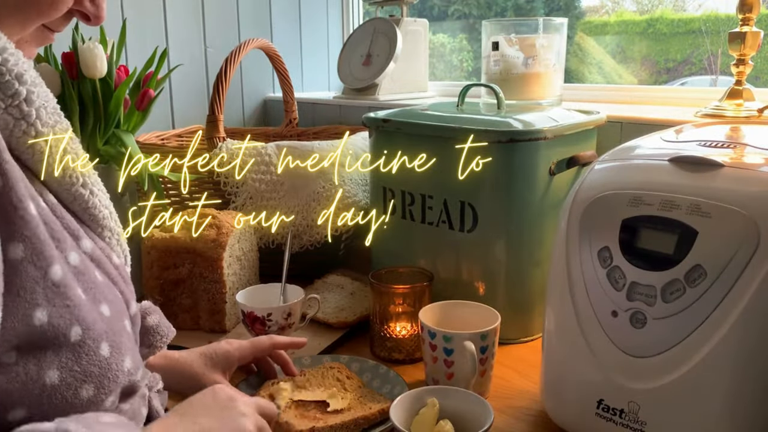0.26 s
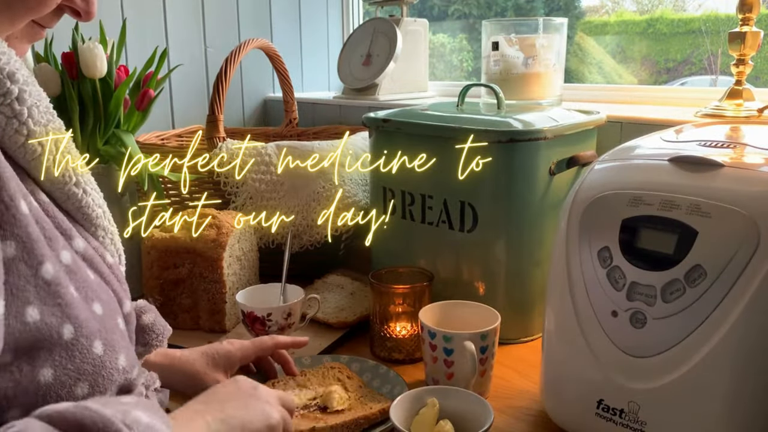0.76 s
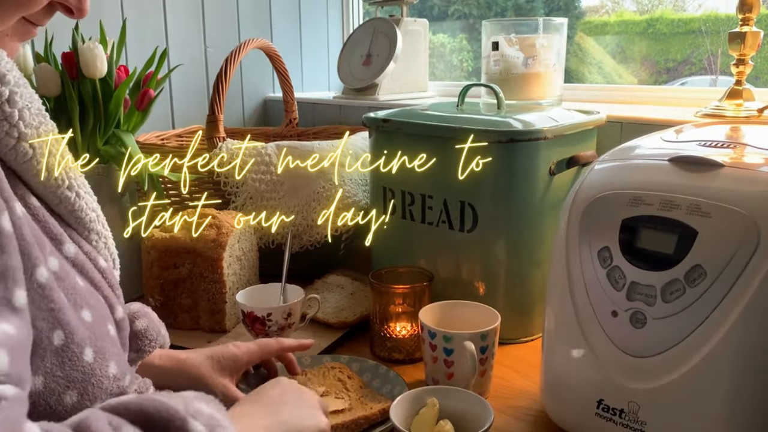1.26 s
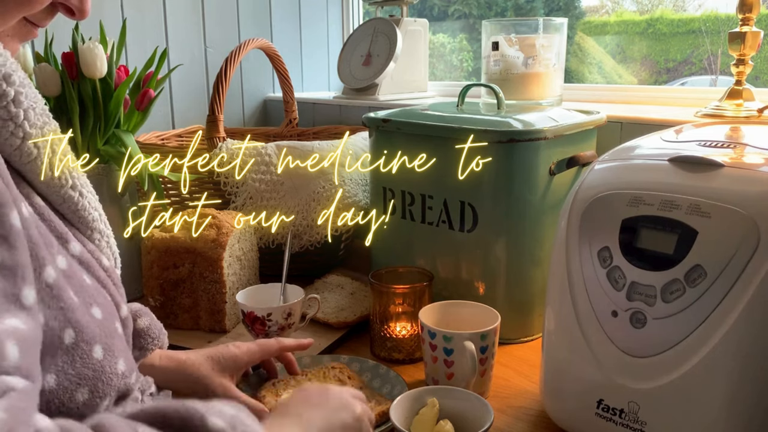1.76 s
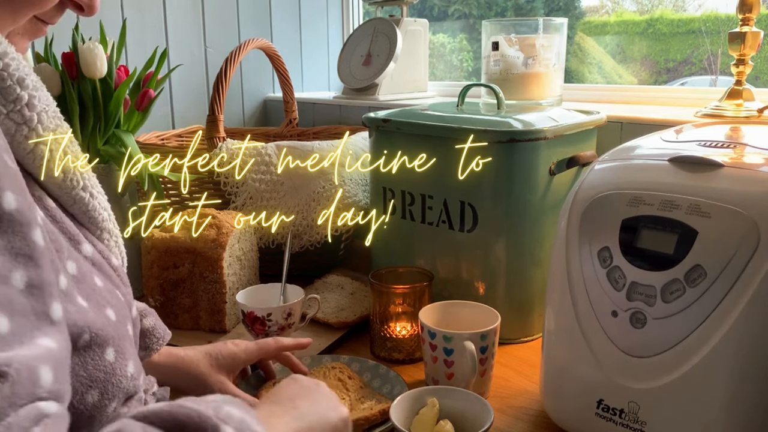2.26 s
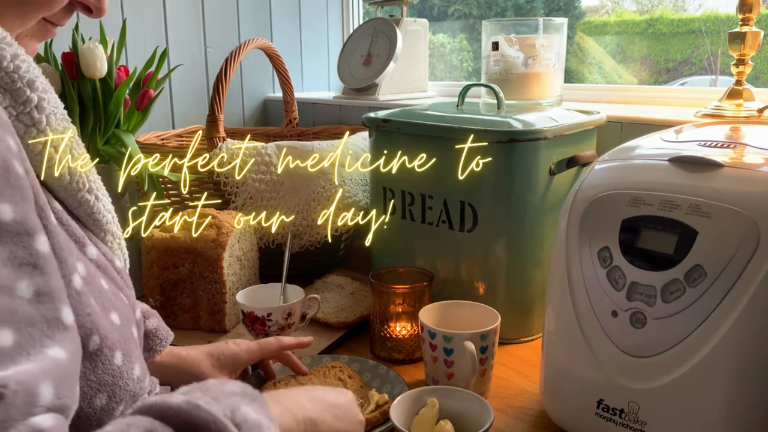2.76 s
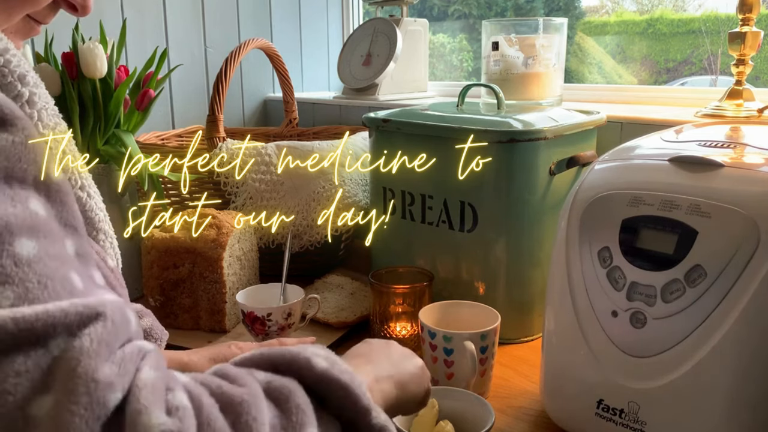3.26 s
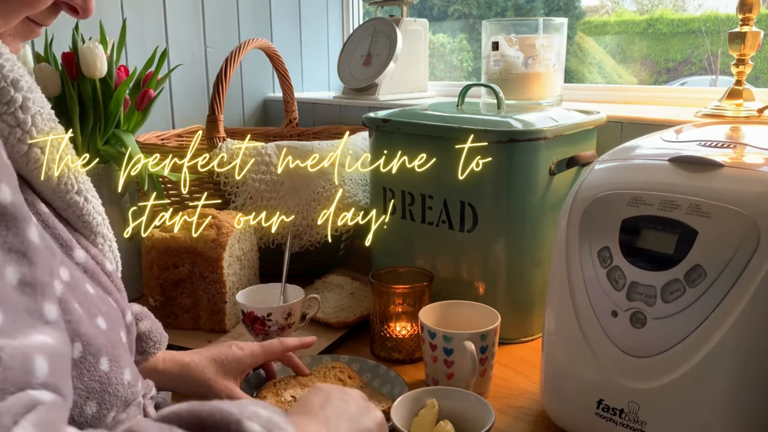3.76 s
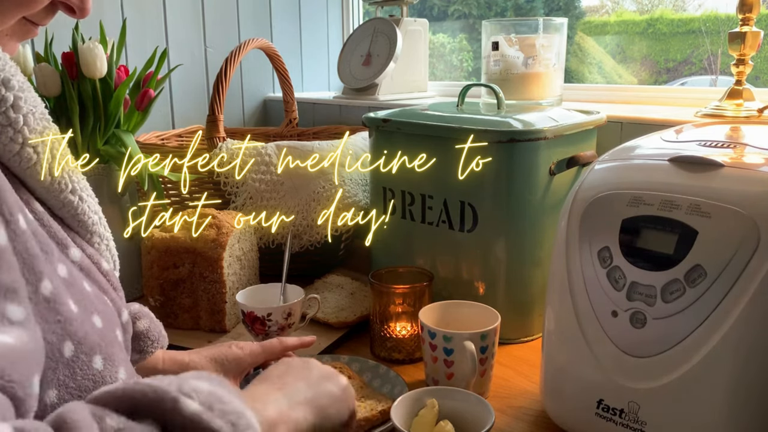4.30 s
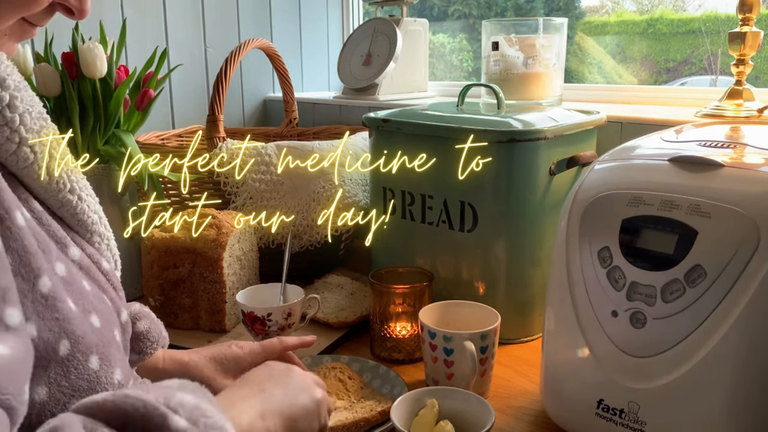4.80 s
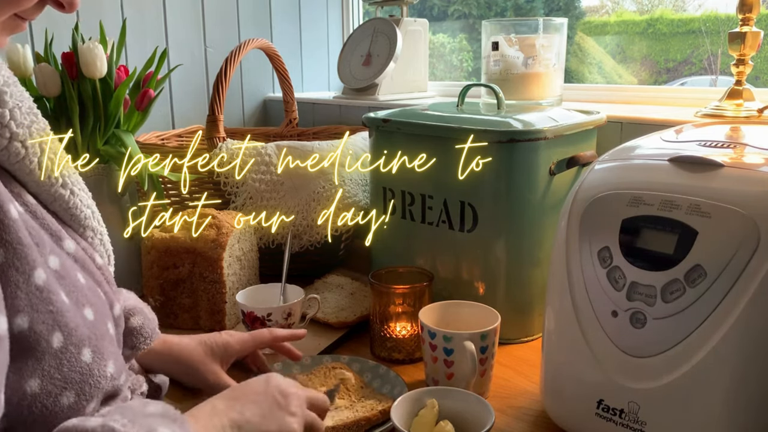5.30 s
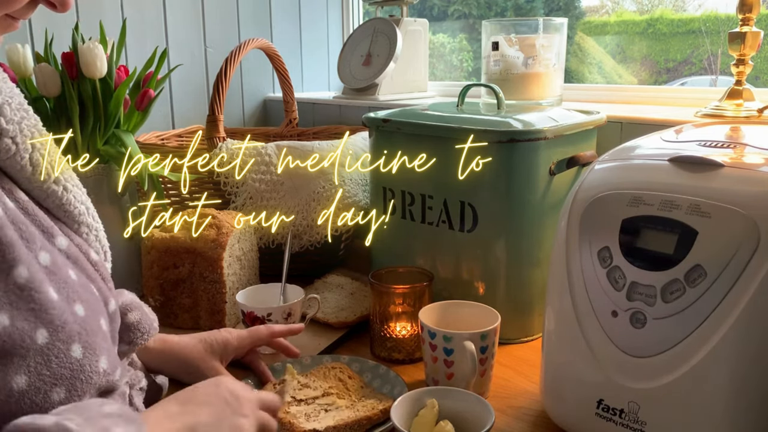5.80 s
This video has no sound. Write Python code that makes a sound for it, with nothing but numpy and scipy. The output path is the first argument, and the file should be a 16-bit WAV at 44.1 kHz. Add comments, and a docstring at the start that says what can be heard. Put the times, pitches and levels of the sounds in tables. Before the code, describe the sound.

Close, crunchy scrapes of a knife buttering toast on a plate, with two quick china clinks in a quiet kitchen.

```python
"""A table knife spreads butter over thick toast on a plate, close by in a small, faintly humming kitchen.
From the start, each stroke snaps countless crumbs, which set the blade ringing and drum through the
plate into the counter. Just after three seconds the knife clinks twice on the china butter bowl.
Then the spreading goes on to the end, the freshly buttered blade ringing a little differently."""
import sys
import numpy as np
from scipy import signal
from scipy.fft import rfft, irfft, next_fast_len
from scipy.io import wavfile
from scipy.ndimage import uniform_filter1d

SR = 44100
rng = np.random.default_rng(int(sys.argv[2]) if len(sys.argv) > 2 else 0)


def wrap_up_sound(samples):
    """Save the sound to the file named by the first command line argument, as 16-bit audio."""
    columns = np.atleast_2d(samples).T
    # keep every value between -1 and 1, then stretch to whole-number steps
    tamed = np.clip(columns, -1, 1)
    steps = np.round(tamed * 32767).astype(np.int16)
    wavfile.write(sys.argv[1], SR, steps)


N = 266805


# knife strokes: touch-down t/s, bearing down/s, easing off/s, swell/dB, crackle/dB, rasp/dB, push/dB
STROKES = [(-0.019, .118, .083, 12, -32.5, -41.5, -55), (0.188, .023, .134, 7, -34, -47, -51),
           (0.6, .123, .085, 7, -30, -40.5, -52), (1.068, .083, .074, 14.5, -31, -39, -48.5),
           (1.666, .131, .042, 13.5, -31.5, -46, -54.5), (2.27, .158, .048, 19, -50.5, -52.5, -52.5),
           (2.51, .087, .043, 13, -53.5, -55.5, -54), (2.66, .14, .06, 8, -49, -59, -55),
           (3.27, .144, .046, 3, -49, -53, -60), (3.485, .053, .13, 11, -46, -53.5, -49),
           (3.65, .105, .098, 8, -43, -50.5, -50), (4.1, .156, .06, 9, -37, -47.5, -48.5),
           (4.557, .107, .121, 11, -36, -44, -51), (5.013, .035, .093, 11, -37, -43.5, -50),
           (5.443, .082, .074, 10, -38.5, -46, -55.5), (5.58, .087, .074, 11, -41, -52.5, -57),
           (5.98, .019, .031, 10, -38.5, -44.5, -64)]

def spreading():
    """The edge catches and slips over the crust: bright crackle, hollow rasp and a low drumming."""
    catching = wobble(rate=90)
    bright, hollow = crumb_crackle(catching), toast_rasp(catching)
    drumming = rubbed_plate(low_hz=25, high_hz=2500)
    sound = leaning() + digging(hollow)
    push_lag_s = 0.05  # the hand's weight reaches the plate a little late
    for start, bear_s, ease_s, swell_db, crackle_db, rasp_db, push_db in STROKES:
        first = round(start * SR)
        now = np.arange(max(first, 0), min(first + 3 * SR // 5, N))
        t = now / SR - start
        crackle = amp(crackle_db) * stroke_gain(t, bear_s, ease_s, swell_db, fade_db_per_s=400)
        rasp = amp(rasp_db) * stroke_gain(t, bear_s, ease_s, swell_db, fade_db_per_s=240)
        push = amp(push_db) * stroke_gain(t, bear_s + push_lag_s, ease_s, swell_db, fade_db_per_s=175)
        # each stroke crosses another part of the slice and meets other echoes
        add(sound, start, scattered(crackle * bright[now], t60=0.016, direct=2.6))
        add(sound, start, scattered(rasp * hollow[now], t60=0.059, direct=1.5))
        add(sound, start, push * drumming[:, now])
    return sound


def stroke_gain(t, bear_s, ease_s, swell_db, fade_db_per_s, settle_s=0.033, touch_db=-13, eased_db=-6.5):
    """The blade lands, bears down, eases off and lifts; t counts from touch-down."""
    landing_db = np.interp(t, [0, settle_s], [touch_db, 0])
    pressure_db = np.interp(t, [0, bear_s, bear_s + ease_s], [-swell_db, 0, eased_db])
    lifted_s = np.maximum(t - bear_s - ease_s, 0)
    return amp(landing_db + pressure_db - fade_db_per_s * lifted_s)


# tone colour of breaking crumbs: f/Hz, level/dB
CRUMB_COLOUR = [(1500, -37), (3500, -9.5), (5500, -14), (7000, 0), (9000, -1.5), (12000, -1), (16000, -2)]

def crumb_crackle(catching):
    """Thousands of crumbs a second snap with bright clicks and set the blade ringing."""
    crumbs = flickering(tiny_clicks(rate=3500, spread_db=5), depth_db=3) * amp(2.2 * catching)
    return unit(amp(-6.5) * unit(coloured(crumbs, CRUMB_COLOUR)) + blade_ring(crumbs))


# ringing tones of the steel blade: f/Hz, width/Hz, level before fresh butter/dB, level after/dB
BLADE_TONES = [(4760, 60, -17, -17), (6430, 64, -7, -1), (7530, 90, -38, -16), (8290, 56, 1.5, 2.5),
               (8985, 56, -0.5, -3.5), (9650, 91, -5, -2.5), (10416, 90, 2.5, -7), (10730, 200, -9, 1),
               (11500, 100, -12.5, -8), (11990, 150, -2.5, -9), (12870, 210, -2.5, 0),
               (14550, 140, -1.5, -5.5), (14960, 140, -9, -11), (15500, 230, -13, -12.5)]

def blade_ring(crumbs, wander_db=5, wander_rate=22, fresh_butter_s=3.2):
    """The point of contact slides along the blade, so the same energy wanders from tone to tone."""
    buttered = np.arange(N) / SR > fresh_butter_s
    ring, power = np.zeros(N), np.zeros(N)
    for hz, width, before_db, after_db in BLADE_TONES:
        share = amp(np.where(buttered, after_db, before_db) + wander_db * wobble(wander_rate))
        ring += share * resonate(crumbs, [(hz, width, 0)])
        power += share ** 2 * width
    return unit(ring / np.sqrt(power))


# tone colour of the scraped slice: f/Hz, level/dB
TOAST_COLOUR = [(150, -25.5), (330, -10), (550, -4.5), (720, 3), (1100, 1.5), (1700, -2), (2400, -5.7),
                (4000, -9), (6000, -10), (9000, -8.5), (16000, -37.5)]
# the plate's own ringing tones: f/Hz, width/Hz, level/dB
PLATE_TONES = [(567.2, 13, -1), (704, 26, 2), (841, 40, -7), (1009, 20, 2.5), (1126, 38, 0.5),
               (1268, 31, -3), (1514, 78, -3), (1770, 24, -3)]

def toast_rasp(catching):
    """The scraped slice sounds hollow, and the plate rings under it."""
    grit = flickering(tiny_clicks(rate=4000, spread_db=3), depth_db=2) * amp(1.2 * catching)
    return unit(unit(coloured(grit, TOAST_COLOUR)) + amp(-6) * unit(resonate(grit, PLATE_TONES)))


# deep digs into the crust: t/s, half length/s, level/dB
DIGS = [(0.12, .032, -37.5), (0.625, .015, -46), (0.712, .028, -36), (2.787, .012, -56), (3.54, .015, -53),
        (4.724, .015, -41), (5.066, .028, -38), (5.468, .018, -50)]

def digging(rasp):
    """The edge digs in, and the rasp swells to a hollow crunch."""
    return scattered(surges(DIGS) * rasp, t60=0.05, direct=1.5)


# the largest flakes of crust breaking: t/s, level/dB
FLAKES = [(0.0158, -31), (0.2135, -28), (0.2236, -24), (0.5535, -50), (0.625, -22), (0.8061, -27),
          (1.1486, -25), (1.6668, -45), (1.71, -27), (2.176, -50), (2.3362, -42), (2.7895, -28),
          (2.8004, -29), (3.406, -26), (4.1653, -29), (4.558, -43), (4.594, -28), (4.6135, -25),
          (4.6537, -19), (5.046, -15), (5.5263, -22), (5.6634, -25)]

def flake_snaps():
    """A large flake gives way in a burst a few milliseconds long and flicks the blade."""
    t, bursts = np.arange(SR // 30) / SR, np.zeros(N)
    for start, db in FLAKES:
        add(bursts, start, amp(db - 60 * t / 0.025) * rng.standard_normal(len(t)))
    click = amp(-7) * coloured(bursts, CRUMB_COLOUR)
    ring = amp(-9.5) * resonate(bursts, [tone[:3] for tone in BLADE_TONES])
    crunch = amp(-15.5) * coloured(bursts, TOAST_COLOUR)
    return scattered(click + ring + crunch, t60=0.02, direct=4.1)


# low tones of the plate on the counter: f/Hz, width/Hz, level/dB
COUNTER_TONES = [(65, 10, -14), (90, 11, -10), (120, 15, -0.5), (155.5, 9.3, 6), (218, 9, 6.5),
                 (283.2, 15, -11.5), (337.6, 17, -8), (415, 40, -13)]

def rubbed_plate(low_hz, high_hz):
    """The plate judders on the counter in tiny slips, under an even force."""
    slips = np.array([tiny_clicks(rate=900, spread_db=2) for _ in range(2)])
    band = signal.butter(2, [low_hz, high_hz], "bandpass", fs=SR, output="sos")
    ring = signal.sosfilt(band, resonate(slips, COUNTER_TONES))
    power = np.abs(uniform_filter1d(ring ** 2, size=2500, axis=1))
    return ring / np.sqrt(power + 1e-12)


# moments when the knife leans on the slice: t/s, half length/s, level/dB
LEANS = [(0.758, .045, -45), (2.785, .018, -50), (3.785, .045, -39.5), (4.145, .03, -53),
         (4.795, .045, -41)]

def leaning():
    """The hand's full weight rubs the plate on the counter; only its strongest tones sound."""
    return surges(LEANS) * rubbed_plate(low_hz=100, high_hz=300)


# knife hits on the bowl: t/s, ring/dB, crack/dB, brightness/(dB per octave), free ringing/s,
# jolt of the counter over the crack/dB
BOWL_HITS = [(3.1393, -17.5, -24.5, -1, 0.066, 2), (3.2355, -19, -25.5, 0.5, 0.0042, 6),
             (3.2425, -19, -30.5, 0, 0.0055, 9)]
# tones of the china bowl and the blade that hits it: f/Hz, level/dB, time to fade by 60 dB/s
BOWL_TONES = [(1314, -26, .14), (2078, -16, .1), (2144, 0, .16), (2820, -30, .2), (3779, -26, .12),
              (5390, -10.5, .17), (5560, -14, .14), (5776, -22, .13), (9560, -17, .08), (9659, -9, .13),
              (12250, -26, .08), (14310, -20, .1), (14665, -17, .11)]
# how much the bowl throws its tones sideways: f/Hz, side over mid/dB
BOWL_SPREAD = [(2100, -12), (5500, 1), (9600, -6)]
# tone colour of steel cracking against china: f/Hz, level/dB
CRACK_COLOUR = [(60, -24.5), (180, 6.5), (500, 7), (1000, 3), (1400, 3.5), (3000, 0), (4400, -9),
                (6200, 5.5), (8000, -10), (16000, -8.5)]

def bowl_clinks(build_cycles=5, damped_t60=0.012):
    """The knife strikes the bowl, which rings until the blade comes to rest on the rim."""
    t = np.arange(SR // 2) / SR
    ring, cracks, jolts = np.zeros((2, N)), np.zeros(N), np.zeros(N)
    hz, level_db, t60 = np.transpose(BOWL_TONES)[:, :, None]
    sideways = amp(along(BOWL_SPREAD, hz))
    build_up = 1 - np.exp(-t * hz / build_cycles)
    for start, ring_db, crack_db, bright_db, free_s, jolt_db in BOWL_HITS:
        decay_db = 60 * t / t60 + 60 * np.maximum(t - free_s, 0) / damped_t60
        tilt_db = bright_db * np.log2(hz / hz[2])
        strength = amp(ring_db + level_db + tilt_db - decay_db) * build_up
        phase = 2 * np.pi * (hz * t + rng.random((len(BOWL_TONES), 1)))
        waves = np.array([np.sin(phase), -sideways * np.cos(phase)])
        add(ring, start, np.sum(strength * waves, axis=1))
        crack = amp(crack_db - 60 * t / 0.06) * rng.standard_normal(len(t))
        add(cracks, start, crack)
        add(jolts, start, amp(jolt_db) * crack)
    knock = amp([[0], [-8]]) * resonate(jolts, COUNTER_TONES)  # the bowl's foot jolts the counter
    return knock + ring + scattered(coloured(cracks, CRACK_COLOUR), t60=0.15, direct=0.38)


def scattered(x, t60, direct):
    """Mid and side of x bouncing among nearby dishes and tins; the echoes fade 60 dB in t60 seconds."""
    t = np.arange(SR // 10) / SR
    bounces = rng.standard_normal((2, len(t))) * amp(-60 * t / t60)
    bounces /= np.linalg.norm(bounces, axis=1, keepdims=True)
    bounces[0, 0] += direct
    bounces[0] /= np.linalg.norm(bounces[0])
    return signal.fftconvolve(x[None], bounces, axes=1)[:, :N]


# how long the kitchen echoes: f/Hz, time to fade by 60 dB/s
ECHO_TIMES = [(100, 1), (400, 0.13), (1000, 0.3085), (2800, 0.41), (7000, 0.35), (15000, 0.1)]

def kitchen_echo(x, delay_s=0.007):
    """The room answers with a wash of echoes; the highest treble dies first."""
    hz, t, noise = signal.stft(rng.standard_normal((2, SR // 2)), SR, nperseg=256)
    fade = amp(-60 * t / along(ECHO_TIMES, hz)[:, None])
    tail = signal.istft(noise * fade, SR, nperseg=256)[1]
    late = np.pad(x, (int(delay_s * SR), 0))
    return signal.fftconvolve(late[None], tail / np.linalg.norm(tail[0]), axes=1)[:, :N]


# tone colour of the quiet house: f/Hz, level/dB
HOUSE_COLOUR = [(25, -19), (60, 2.5), (110, 0), (280, -9), (400, -15), (560, -16), (760, -15), (1000, -27),
                (2000, -31.5), (5000, -37.5), (10000, -33), (16000, -32)]
# faint hums: start t/s, end t/s, f/Hz, level/dB
HUMS = [(1.305, 1.68, 770, -77), (2.233, 2.497, 275, -59), (2.98, 3.2, 272, -62)]

def house_noise():
    """The steady rumble and hiss of the house, with faint hums that swell and fade."""
    t = np.arange(N) / SR
    air = amp(-70.5) * unit(coloured(rng.standard_normal((2, N)), HOUSE_COLOUR))
    for start, end, hz, db in HUMS:
        swell = np.sin(np.pi * np.clip((t - start) / (end - start), 0, 1))
        wavering_hz = hz * (1 + 0.015 * wobble(rate=60))
        air[0] += amp(db) * swell * np.sin(2 * np.pi * np.cumsum(wavering_hz) / SR)
    return air


# stereo width, with bass and top octave near the middle: f/Hz, side over mid/dB
STEREO_WIDTH = [(60, -7), (170, -14), (300, -5.5), (500, -3), (1200, -1), (3500, -1), (5600, -1),
                (7200, -10), (16000, -8)]
# balance between the two sides: f/Hz, left minus right/dB
BALANCE = [(60, -3), (260, -3), (500, 0), (1200, 1), (2000, 0), (3500, -1), (5400, -4.5), (6600, -0.5)]
# how much sooner the sound arrives on the left: f/Hz, lead/s
LEFT_LEAD = [(3000, 0.00007), (5500, 0.00008), (7000, 0)]

def left_and_right(mid, side):
    """Mid is what both ears share, side is how they differ; lower sounds reach the left first."""
    side = filtered(side, lambda hz: amp(along(STEREO_WIDTH, hz)))
    half = np.array([[.5], [-.5]])

    def placement(hz):
        return amp(half * along(BALANCE, hz)) * np.exp(2j * np.pi * half * hz * along(LEFT_LEAD, hz))
    return filtered(np.array([mid + side, mid - side]), placement)


def tiny_clicks(rate, spread_db):
    """Randomly timed clicks of differing size, about rate a second."""
    size = amp(spread_db * np.clip(rng.standard_normal(N), -2, 2))
    happens = rng.random(N) < rate / SR
    return unit(happens * size * np.sign(rng.standard_normal(N)))


def flickering(x, depth_db):
    """The tone colour flickers from moment to moment; the overall level stays."""
    spectra = signal.stft(x, nperseg=256)[2]
    patches = uniform_filter1d(rng.standard_normal(spectra.shape), size=4, axis=0)
    patches = uniform_filter1d(patches, size=5, axis=1)
    return unit(signal.istft(spectra * amp(depth_db * unit(patches)), nperseg=256)[1][:N])


def surges(rows):
    """A gain curve of brief, bell-shaped surges of force."""
    t, gain = np.arange(-SR // 8, SR // 8) / SR, np.zeros(N + SR)
    for peak_s, half_s, db in rows:
        add(gain, peak_s, amp(db) * np.exp(-(t / half_s) ** 2))
    return gain[len(t) // 2:][:N]


def resonate(x, tones):
    """x sets an object ringing at its own tones."""
    drive = x + 1e-15  # a trace of offset keeps the filters quick through silence
    return sum(amp(db) * signal.lfilter(*signal.iirpeak(hz, hz / width, SR), drive)
               for hz, width, db in tones)


def coloured(x, points, size=4096):
    """Give x a tone colour, with a filter that never sounds ahead of its input."""
    cepstrum = irfft(np.log(amp(along(points, np.fft.rfftfreq(size, 1 / SR)))))
    cepstrum[1:size // 2] *= 2
    cepstrum[size // 2 + 1:] = 0
    response = irfft(np.exp(rfft(cepstrum)))
    return signal.oaconvolve(x, np.broadcast_to(response, x.shape[:-1] + (size,)), axes=-1)[..., :N]


def filtered(x, response):
    """Scale and shift each frequency of x by response(hz)."""
    size = 2 * next_fast_len(N // 2 + SR // 4)
    return irfft(rfft(x, size) * response(np.fft.rfftfreq(size, 1 / SR)), size)[..., :N]


def wobble(rate):
    """A random curve that heads for a new value rate times a second."""
    knots = rng.standard_normal(int(N * rate / SR) + 2)
    return np.interp(np.arange(N) * rate / SR, np.arange(len(knots)), knots)


def along(points, hz):
    """Read between (frequency, value) points, with octaves evenly spaced."""
    point_hz, values = np.transpose(points)
    return np.interp(np.log(hz + 1), np.log(point_hz + 1), values)


def add(track, start, sound):
    """Mix a sound into a track from start seconds on."""
    part = track[..., max(round(start * SR), 0):][..., :sound.shape[-1]]
    part += sound[..., :part.shape[-1]]


def amp(db):
    """Decibels to gain."""
    return 10 ** (np.asarray(db) / 20)


def unit(x):
    """Scale x to an average power of 1."""
    return x / np.sqrt(np.mean(x ** 2) + 1e-20)


def scene():
    """Toast and bowl in the kitchen, as left and right."""
    toast, bowl = spreading() + flake_snaps(), bowl_clinks()
    echo = amp(-11) * kitchen_echo(toast[0]) + amp(-6.5) * kitchen_echo(bowl[0])
    mid, side = toast + bowl + echo + house_noise()
    return left_and_right(mid, side)


def record(dry):
    """The very highest treble is cut off steeply."""
    top_hz = 15700
    return filtered(dry, lambda hz: 1 / np.sqrt(1 + (hz / top_hz) ** 200))


dry = scene()
out = record(dry)
wrap_up_sound(out)
```